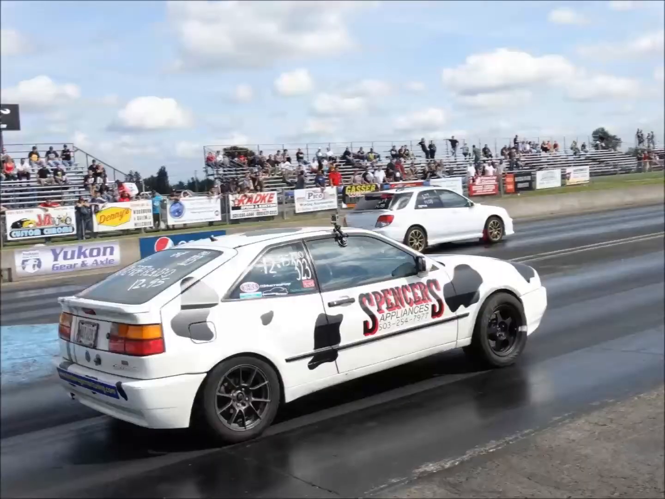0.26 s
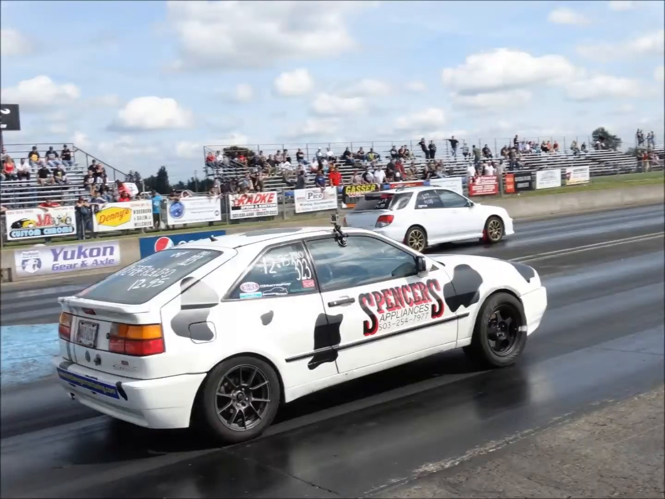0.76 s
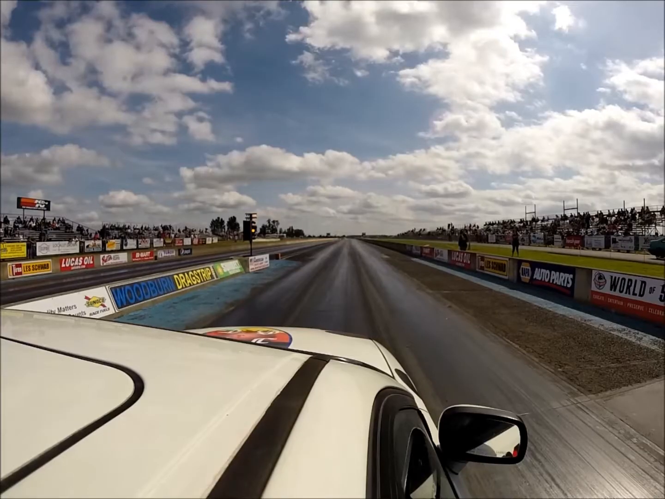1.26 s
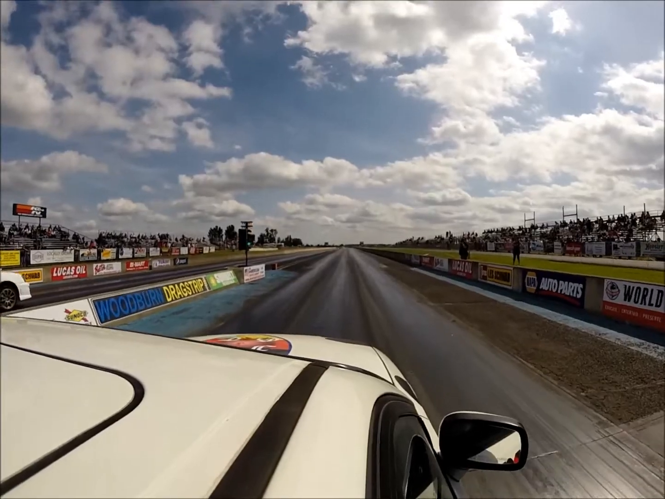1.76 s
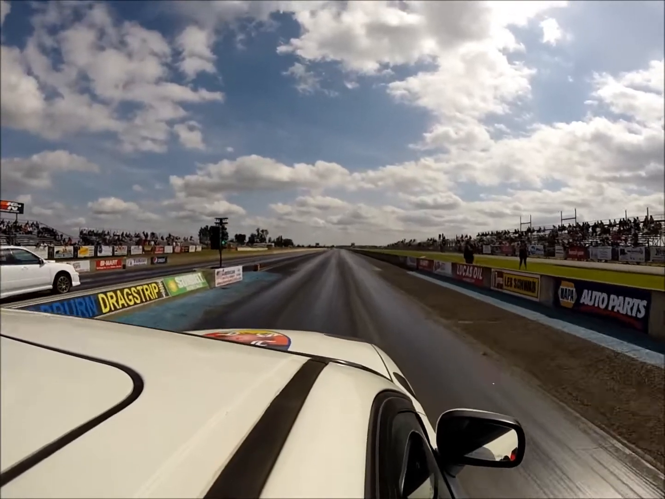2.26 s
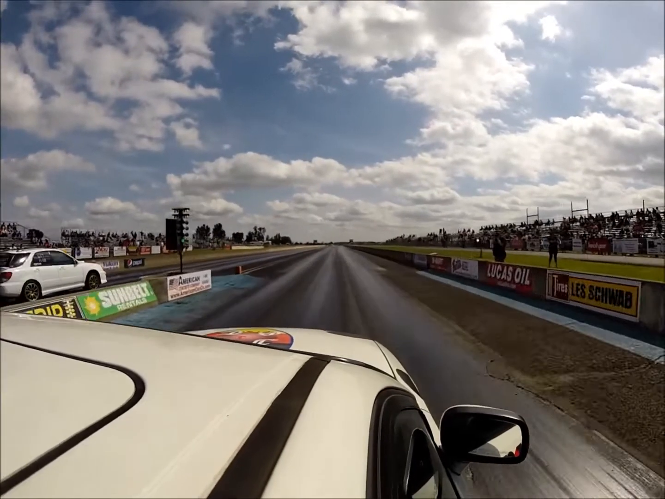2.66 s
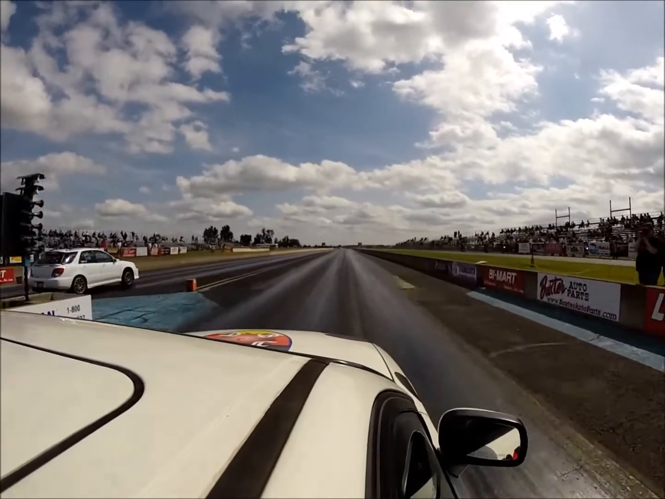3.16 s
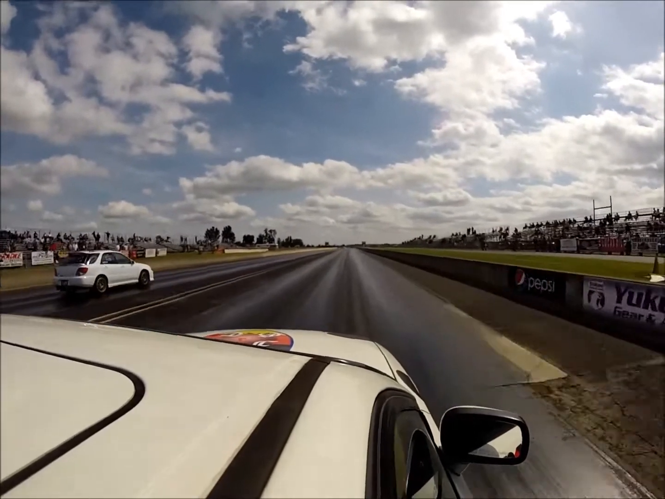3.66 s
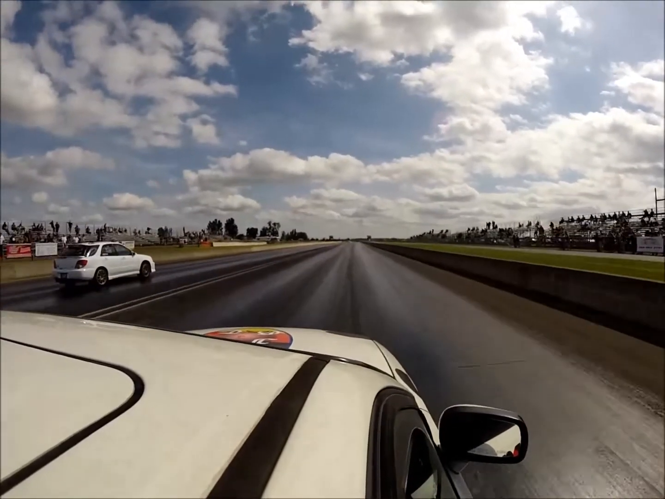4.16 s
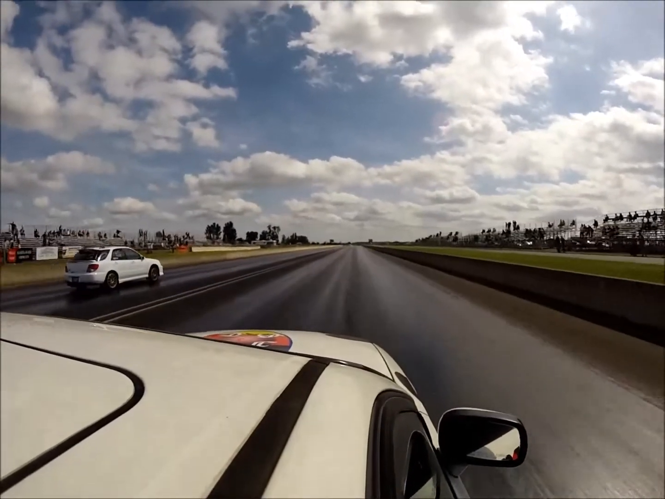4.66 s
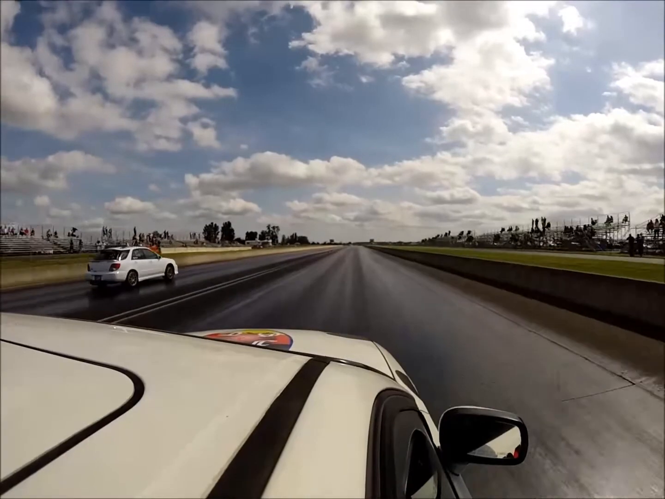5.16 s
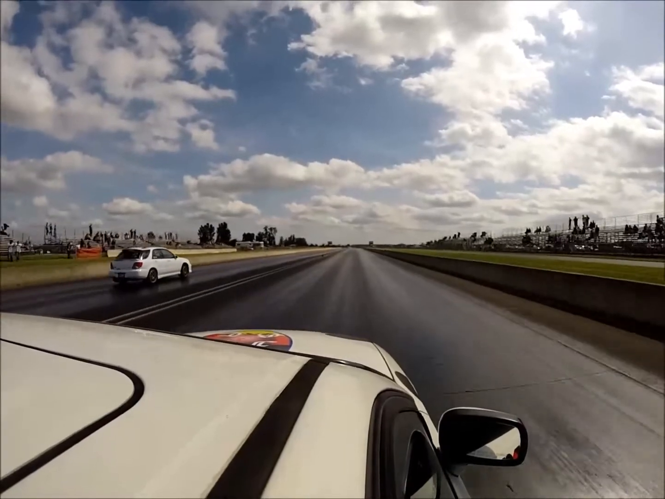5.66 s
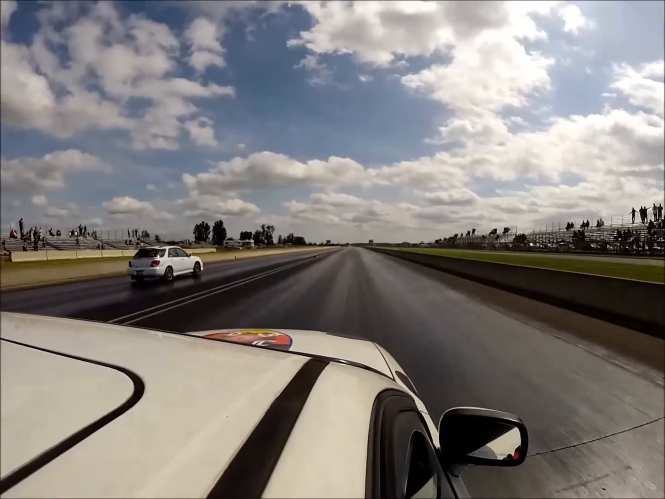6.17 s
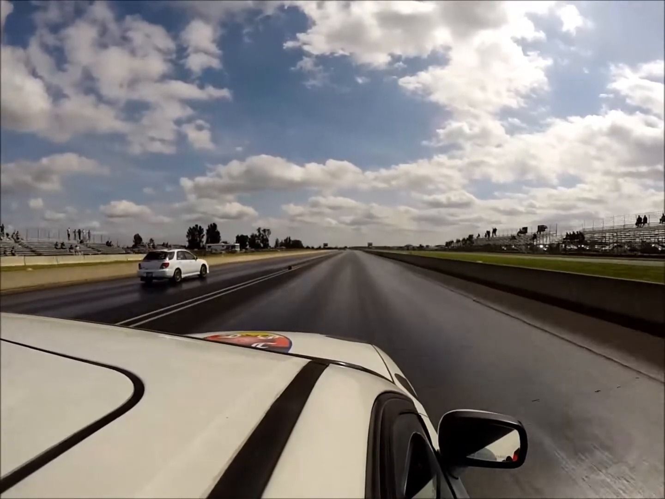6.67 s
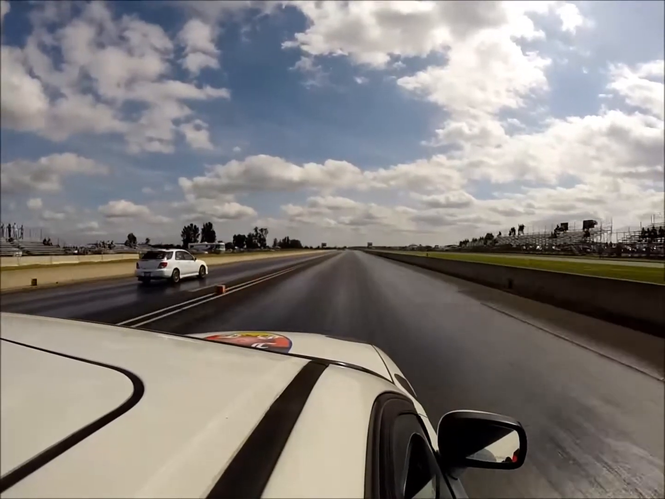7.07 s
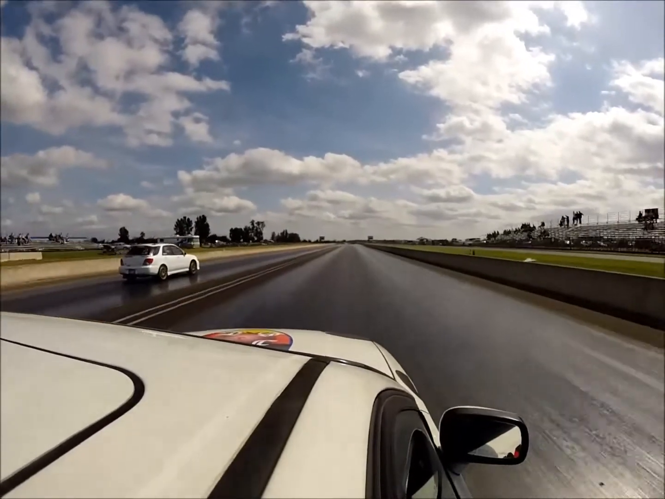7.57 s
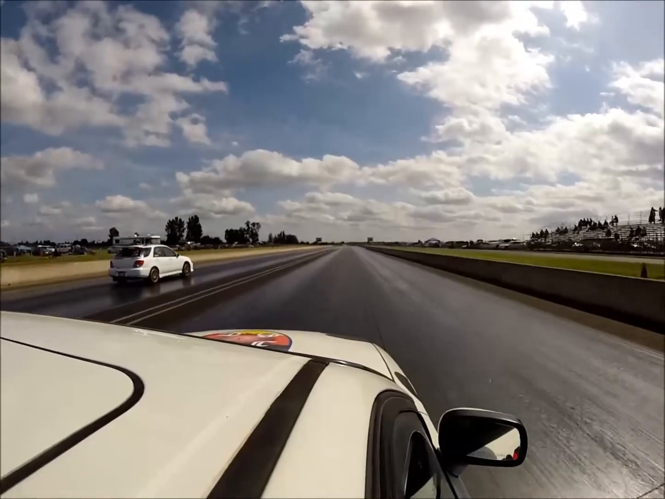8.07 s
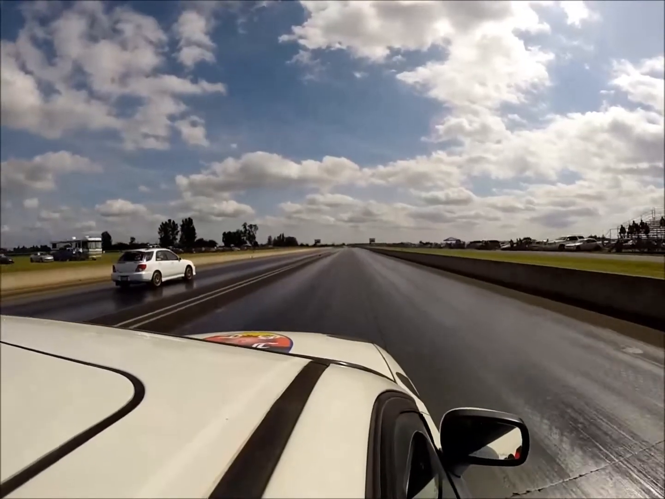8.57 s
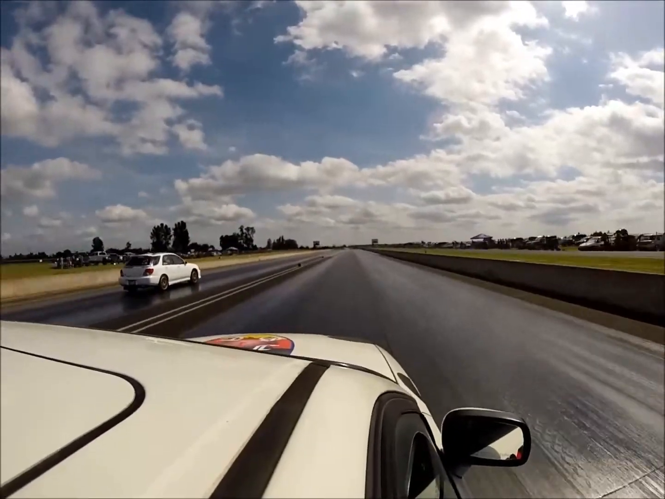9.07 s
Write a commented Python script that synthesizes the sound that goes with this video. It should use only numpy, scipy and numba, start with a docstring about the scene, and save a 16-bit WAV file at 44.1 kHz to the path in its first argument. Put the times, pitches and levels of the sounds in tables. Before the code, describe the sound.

A microphone on a racing car's roof, close and in open air. After initial silence the exhaust hums and rasps at launch, tyres hiss and squeak, and a thin breathy turbo whistle rises. Two long pulls each end in a falling pitch and a puff of released pressure, the second fainter. Wind buffets with hard thuds, briefly ducking the sound, and steady airy roar dominates the end.

```python
"""On the roof of a turbocharged car during a drag run, with the camera's microphone out in the wind.
The sound cuts in as the clutch bites. The exhaust hums as sines on the crank orders through two gear
changes; gas, tyres and air hiss as shaped noise, and slipping tread chirps. The turbo whistles a breathy
tone and blows off its boost. Wind buffets the microphone, whose gain control ducks after loud peaks."""
import sys
import numpy as np
from scipy import signal
from scipy.fft import rfft, irfft
from scipy.io import wavfile
from scipy.ndimage import uniform_filter1d
from numba import njit

SR = 44100
rng = np.random.default_rng(int(sys.argv[2]) if len(sys.argv) > 2 else 0)


def put_to_file(sound):
    """Save the sound as 16-bit audio at rate SR, in the file named by the first command-line argument."""
    columns = np.atleast_2d(sound).T  # one column per channel
    safe = np.clip(columns, -1, 1)
    whole_steps = np.round(safe * 32767)
    wavfile.write(sys.argv[1], SR, whole_steps.astype(np.int16))


N = 411453

START_S = .93425  # silence before this
GRIP_S = 1.69  # the tyres stop spinning


def undb(db):
    """Amplitude of a level in dB."""
    return 10 ** (np.asarray(db) / 20)


def curve(table):
    """Columns of a table drawn out over all samples, against its first column in seconds."""
    s, *columns = np.transpose(table)
    return [np.interp(np.arange(N) / SR, s, c) for c in columns]


def ramp(s, length):
    """0 before s, rising evenly to 1 at s + length (seconds)."""
    return np.clip((np.arange(N) / SR - s) / length, 0, 1)


def blend(a, b, share):
    """Unrelated sounds mixed at constant power; share is that of b."""
    share = np.clip(share, 0, 1)
    return np.sqrt(1 - share) * a + np.sqrt(share) * b


def walk(rate):
    """Random levels held 1 / rate s and slewed twice; spread near 1."""
    k = int(SR / rate)
    steps = np.repeat(rng.standard_normal(N // k + 1), k)[:N]
    return 1.58 * uniform_filter1d(uniform_filter1d(steps, k), k)


def colour(x, spectrum):
    """Gives x the slope of a spectrum table, 90 dB down outside it; rms 1."""
    hz, db = np.transpose(spectrum)
    f = np.arange(1, N // 2 + 2) * SR / N
    gain_db = np.interp(np.log(f), np.log(hz), db, -90, -90)
    y = irfft(rfft(x) * undb(gain_db), N)
    return y / y.std()


def turbulence(spectrum, swell_db, flicker_db, rate, gate=1):
    """Octave bands of noise that swell together and flicker alone, as turbulent air does."""
    hz = np.array(spectrum)[:, 0]
    f = np.arange(N // 2 + 1) * SR / N
    bands, swell = 0, walk(rate / 2)
    octaves = np.arange(np.ceil(np.log2(hz[-1] / hz[0])))
    for low in hz[0] * 2. ** octaves:
        band = irfft(rfft(rng.standard_normal(N)) * (f >= low) * (f < 2 * low), N)
        bands = bands + band * undb(swell_db * swell + flicker_db * walk(rate))
    return colour(bands * gate, spectrum)


# The engine through the run. Each row: time in seconds, crank rate in Hz, level of the firing tone in dB,
# level of the overtones in dB, both before the pipe.
ENGINE = [(0.935, 70.4, -19.5, -12), (1.1, 73.1, -13, -18.5), (1.2, 78.5, -16, -21),
          (1.36, 90.9, -14, -6.5), (1.46, 97.76, -12, -16.5), (1.54, 102.8, -17, -14.5),
          (1.6, 97.9, -11.5, -16), (1.66, 93.1, -13.5, -6), (1.72, 82.3, -17, -12.5),
          (1.79, 81.84, -15.5, -11), (1.9, 80.84, -12.5, -15), (2.1, 85.34, -15, -16),
          (2.3, 87.05, -17, -15.5), (2.42, 89.39, -18, -13), (2.52, 92.4, -15, -15.5),
          (2.8, 112.8, -11.5, -14.5), (2.94, 118.5, -11.5, -11), (3.22, 130.7, -13.5, -17.5),
          (3.5, 138.4, -17.5, -10.5), (3.7, 138, -15.5, -7), (3.77, 135.1, -35, -11),
          (3.92, 112.2, -15, -18), (4.0, 107.2, -13.5, -21), (4.24, 92.4, -14.5, -21),
          (4.42, 83.44, -25, -18), (4.5, 71.36, -13.5, -16), (5.15, 78.33, -13.5, -17.5),
          (5.35, 83.36, -20, -10), (5.75, 91.7, -19, -22), (5.95, 96.34, -21.5, -11),
          (6.15, 102.8, -17.5, -13.5), (6.3, 105.2, -12, -19), (6.4, 107, -17, -27),
          (6.95, 118.1, -18.5, -26), (7.35, 126.5, -24, -27), (7.48, 127.1, -28, -23),
          (7.7, 114.2, -21, -21), (8.1, 93.1, -21, -40), (8.25, 88.7, -27.5, -26), (9.3, 94.34, -25.5, -26)]


def crank():
    """The crank turns at a slightly unsteady rate; its angle in radians times the order drives each tone."""
    crank_hz, firing_db, overtones_db = curve(ENGINE)
    running = np.arange(N) >= START_S * SR
    turn = 2 * np.pi * np.cumsum(running * crank_hz * (1 + 0.0029 * walk(45))) / SR
    return running, turn, crank_hz, firing_db, overtones_db


# Exhaust resonances (+) and dead spots (-) that passing orders meet.
# Each row: centre in Hz, width in Hz, gain in dB.
PIPE = [(165.8, 6, -12), (224.55, 9.4, -12), (243, 26, 3.5), (291, 56, 2), (314, 15.3, 10),
        (369.6, 23.5, 6.5), (404, 17, -5.5), (417, 51, 4), (506, 25, -6), (590.6, 45, 10.5), (656, 40, 4),
        (765, 136, -2.5), (1067, 53, 7.5)]
# Overtones of the crank; order 2, the firing rate, has its own level.
# Each row: crank order, level in dB over that of the overtones.
ORDER_DB = [(1, -19.5), (3, -15.5), (4, -13.5), (5, -23), (6, -23), (7, -21.5), (8, -27.5), (9, -31),
            (10, -35), (11, -35.5), (12, -29), (13, -33.5)]
UNLOADED_DB = -5  # orders above the fourth are weaker while the wheels spin


def exhaust(turn, crank_hz, firing_db, overtones_db):
    """Clean tones on crank orders, shaped by the pipe; uneven cylinders add odd ones, each wavering alone."""
    spinning = 1 - ramp(GRIP_S, 0.12)
    orders = [(2, firing_db)] + [(round(k), overtones_db + db) for k, db in ORDER_DB]
    out = 0
    for k, db in orders:
        pipe_db = sum(g / (1 + (2 * (k * crank_hz - f) / w) ** 2) for f, w, g in PIPE)
        waver_db = min(.6 * k, 3.) * walk(22 if k < 5 else 36)
        unloaded_db = UNLOADED_DB * spinning * (k > 4)
        lag = 2 * np.pi * rng.random() * (k != 2)  # counted from the firing order
        out = out + undb(db + pipe_db + waver_db + unloaded_db) * np.sin(k * turn + lag)
    return np.sqrt(2) * out


# Roar from the pipe, then from the air. Each row: frequency in Hz, density in dB per Hz.
PIPE_ROAR = [(120, -35.5), (200, -7.5), (292, -12), (352, -7.5), (398, -10), (580, -3.5), (755, -13.5),
             (1010, -4), (1540, -16), (1900, -20.5), (2470, -50), (4180, -120)]
ROAR = [(120, -26), (200, -2.5), (237, -10.5), (409, -2.5), (700, -5.5), (983, -11), (1600, -26.5),
        (1900, -43), (2470, -69), (4180, -120)]


def roar(puff, air):
    """Low noise: exhaust gas pulsing with the firings yields to steady air rush."""
    return blend(turbulence(PIPE_ROAR, 0.41, 0.55, 40, puff ** 3), turbulence(ROAR, 0.55, 0.64, 80), air)


# Hiss in wheelspin, then with grip. Each row: frequency in Hz, density in dB per Hz.
SPIN = [(820, -31), (1400, -11), (1650, -17), (1770, -10), (2200, 4.5), (2910, -7.5), (3260, -1.5),
        (3680, -12.5), (4150, -11), (4440, -19), (6050, -10.5), (6990, -29), (8500, -32), (11000, -70),
        (18700, -120)]
HISS = [(820, -13), (1400, -9), (1630, -10), (1920, 2), (2010, 2), (2450, -1), (2660, -5), (3280, -2),
        (3710, -9.5), (4180, -8.5), (5010, -11), (5490, -8.5), (6050, -13.5), (7420, -19.5), (8500, -29),
        (11000, -61.5), (18700, -120)]


def hiss(puff, gripping):
    """Middle noise: wheelspin colours it until the tyres grip, then it pulses with the firings."""
    return blend(turbulence(SPIN, .9, 1.6, 29.96), turbulence(HISS, 0.6, 0.83, 30, puff), gripping)


# Sizzle of the gas, then of the air stream. Each row: frequency in Hz, density in dB per Hz.
SHARP = [(3820, -26.5), (6500, -1.5), (7810, -5.5), (9880, -16), (12100, -29), (13200, -32), (14200, -40.5)]
AIR_SHARP = [(3820, -33), (6500, -5), (7170, -10.5), (9080, -8.5), (9850, -14), (11200, -13.5),
             (13200, -20), (14200, -29)]


def sizzle(air):
    """Top noise: the gas sizzle yields to that of the air stream."""
    return blend(turbulence(SHARP, 0.99, 1.0, 22), turbulence(AIR_SHARP, 0.98, .8, 30), air)


# Noise levels at the roof. Each row: time in seconds, roar in dB, hiss in dB; the sizzle follows the hiss.
GAS = [(0.94, -37, -51), (1.08, -36.5, -50), (1.28, -21, -31.5), (1.4, -25.5, -33.5), (1.55, -20, -27.5),
       (1.66, -26, -29.5), (1.84, -23, -24), (1.96, -27.5, -35), (2.01, -24.5, -24), (2.1, -21, -26.5),
       (2.2, -20, -24), (2.45, -21.5, -27.5), (2.62, -28, -31.5), (2.77, -21, -27), (2.84, -18.5, -24.5),
       (2.93, -24, -29.5), (3.42, -20, -27), (3.7, -16.5, -21.5), (3.76, -24, -28), (3.82, -27, -29.5),
       (3.88, -25, -35.5), (4.13, -30, -38.5), (4.45, -20.5, -37), (4.65, -28, -41.5), (4.95, -25, -41),
       (5.1, -21, -36), (5.7, -20, -34.5), (6.2, -18.5, -33), (6.45, -19.5, -36.5), (6.88, -17.5, -34.5),
       (7.5, -18.5, -37), (9.28, -17.5, -36)]
# Air along the body. Each row: time in seconds, its share of the noise from 0 to 1.
AIR_SHARE = [(1.12, 0.0), (1.3, 0.3), (2.6, 0.18), (3.7, 0.5), (4.4, 0.93)]
# sizzle level in dB when the hiss is at FULL_DB, dB per dB of hiss, extra dB in wheelspin
FULL_DB, SIZZLE_DB, SIZZLE_SLOPE, SIZZLE_SPIN_DB = -27, -47, 1.37, -11
SIZZLE_GAIN_DB_PER_S = 1.1  # the air stream brightens after the last row of AIR_SHARE


def gas(turn):
    """Exhaust roar yields to air rush, with the hiss and sizzle above it; the firings puff the gas."""
    roar_db, hiss_db = curve(GAS)
    air, gripping = curve(AIR_SHARE)[0], ramp(GRIP_S, 0.033)
    sizzle_db = SIZZLE_DB + SIZZLE_SLOPE * (hiss_db - FULL_DB) + SIZZLE_SPIN_DB * (1 - gripping)
    brightening_s = np.maximum(np.arange(N) / SR - AIR_SHARE[-1][0], 0)
    sizzle_db = sizzle_db + SIZZLE_GAIN_DB_PER_S * brightening_s
    puff = 1 + 0.089 * np.cos(2 * turn)  # at the firing rate
    low, middle = undb(roar_db) * roar(puff, air), undb(hiss_db) * hiss(puff, gripping)
    return low + middle + undb(sizzle_db) * sizzle(air)


# Wind at the microphone. Each row: time in seconds, rumble in dB.
WIND = [(0.95, -43), (1.3, -23), (1.45, -26), (1.63, -23), (2.3, -23), (3.3, -21), (3.7, -12.5),
        (4.1, -24.5), (4.45, -14.5), (4.8, -21.5), (5.3, -16), (6.3, -16.5), (9.2, -16)]
# Body shudder, then eddies at the port. Each row: frequency in Hz, density in dB per Hz.
SHUDDER = [(12, -53), (20, -15), (91, -8), (134, 0.5), (172, -4), (211, -4.5), (300, -14.5), (390, -46),
           (660, -120)]
BUFFET = [(11, -36.5), (18, -1), (81, 5), (161, 1.5), (184, -3), (235, -2.5), (365, -6), (400, -16.5),
          (520, -18), (880, -120)]
EDDIES_FROM_S, EDDIES_GROW_S = 1.84, 2.2  # eddies take over as speed builds: start, duration


def wind():
    """Body shudder yields to eddies on the microphone port, both low turbulent noise."""
    shudder = turbulence(SHUDDER, 0.75, 1.6, 24)
    eddies = turbulence(BUFFET, 0.58, 0.84, 24)
    return undb(curve(WIND)[0]) * blend(shudder, eddies, ramp(EDDIES_FROM_S, EDDIES_GROW_S))


# Large eddies right on the microphone.
# Each row: centre in seconds, peak in dB ahead of the gain control, time scale in ms, sign of the push.
BLOWS = [(1.675, -15, 0.66, -1), (3.7345, 8, 0.99, -1), (3.8327, 0, 1.74, -1), (4.427, -4, 0.65, 1),
         (5.912, 1.5, 1.62, -1), (6.2277, 1, 1.68, -1), (6.3233, 2, 1.76, -1), (6.9168, 3, 1.85, 1)]


def blows():
    """Each large eddy lands as a push between two rebounds."""
    out, t = np.zeros(N), np.arange(N) / SR
    for s, db, ms, sign in BLOWS:
        u = (t - s) * 1000 / ms
        out += np.sign(sign) * undb(db) * (1 - 1.2 * u ** 2) * np.exp(-np.minimum(u ** 2, 60))
    return out


# Chirps of the tyres. Each row: centre in seconds, peak in dB before the flicker.
CHIRPS = [(1.78, -43), (1.835, -36), (2.02, -42), (2.15, -29), (2.21, -29.5), (2.38, -31.5), (2.52, -31)]
SQUEAL_HZ = 1830


def tyres():
    """Slipping tread squeals in short chirps near one pitch, which wavers as the level flickers."""
    t = np.arange(N) / SR
    slip = sum(undb(db) * np.exp(-np.minimum(((t - s) / 0.03) ** 2, 60)) for s, db in CHIRPS)
    phase = 2 * np.pi * np.cumsum(SQUEAL_HZ * (1 + 0.0132 * walk(60))) / SR
    return slip * undb(3.49 * walk(200)) * np.sqrt(2) * np.sin(phase)


# Turbo whistle, one table for each build-up of boost.
# Each row: time in seconds, whistle in Hz, level in dB before the flicker.
TURBO = [
    [(2.2, 8950, -64), (2.4, 9600, -64), (2.52, 10300, -63), (2.68, 10800, -60), (3.3, 11580, -62),
     (3.85, 11780, -68)],
    [(5.0, 6400, -52), (5.15, 7000, -57), (5.3, 7678, -76), (5.52, 9183, -60), (5.62, 9986, -68),
     (5.8, 10650, -62.5), (6.7, 10870, -64), (6.88, 11080, -67), (7.0, 11230, -80)],
    [(8.6, 8745, -65), (8.8, 9490, -77), (9.15, 10590, -68)],
]
# the whistle is breathy while slow and clears over CLEARING_HZ below CLEAR_HZ
BREATH_SHARE, CLEAR_HZ, CLEARING_HZ = 0.95, 11500, 900


def turbo():
    """The compressor wheel sings a thin tone wrapped in a breathy band while boost lasts."""
    out = 0
    for table in TURBO:
        hz, db = curve(table)
        on = ramp(table[0][0], .06) - ramp(table[-1][0] - .06, .06)
        breath = np.clip((CLEAR_HZ - hz) / CLEARING_HZ, .15, BREATH_SHARE)
        phase = 2 * np.pi * np.cumsum(hz * (1 + .003 * walk(60))) / SR
        level = on * undb(db + 1.5 * walk(40))
        # fast random level changes spread the tone into a band
        out = out + level * blend(0.99, walk(800), breath) * np.sqrt(2) * np.sin(phase)
    return out


# Boost blown off. Each row: start in seconds, peak in dB before the turbulence.
VENTS = [(3.93, -28), (7.666, -35.5)]
# Noise of the valve. Each row: frequency in Hz, density in dB per Hz.
VENT = [(1000, -40), (1700, -7), (2220, 1.5), (2700, -17), (3280, -4), (3820, -5), (4170, 0), (5120, -7.5),
        (6440, -3.5), (7910, -18), (14200, -29)]
# opening time, start of the fade after the start of opening, time constant of the fade
VENT_OPEN_S, VENT_HOLD_S, VENT_FADE_S = .02, .045, .055


def blow_off():
    """The valve snaps open, blows turbulent noise, and fades as the pressure runs out."""
    t = np.arange(N) / SR
    flow = 0
    for s, db in VENTS:
        pressure = np.exp(-np.maximum(t - s - VENT_HOLD_S, 0) / VENT_FADE_S)
        flow = flow + undb(db) * ramp(s, VENT_OPEN_S) * pressure
    return flow * turbulence(VENT, 0.69, 0.72, 30)


def scene():
    """Everything that reaches the roof, from the moment the sound cuts in."""
    running, turn, crank_hz, firing_db, overtones_db = crank()
    car = exhaust(turn, crank_hz, firing_db, overtones_db) + gas(turn)
    sound = car + wind() + blows() + tyres() + turbo() + blow_off()
    return (sound * running)[None]


@njit
def duck(x, top, attack, release, slope):
    """Gain control: follows the peaks fast, lets go slowly, turns down what exceeds top."""
    y, e = np.empty(len(x)), 0.
    for i in range(len(x)):
        a = abs(x[i])
        e += (a - e) * (attack if a > e else release)  # shares per sample
        y[i] = x[i] * (top / max(e, top)) ** slope
    return y


TOP_HZ = 14360  # upper edge of what the camera keeps


def record(dry):
    """The camera ducks after loud peaks, clips what slips through and cuts the top."""
    held = duck(dry[0], 0.46, 0.023, 0.00042, 1.0)
    low_pass = signal.ellip(6, .2, 60, TOP_HZ, fs=SR, output="sos")  # order, ripple dB, stop band dB
    return signal.sosfilt(low_pass, np.clip(held, -.98, .98))[None]


dry = scene()
out = record(dry)
put_to_file(out)
```